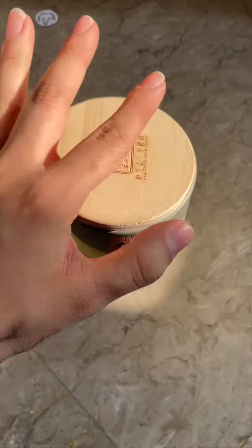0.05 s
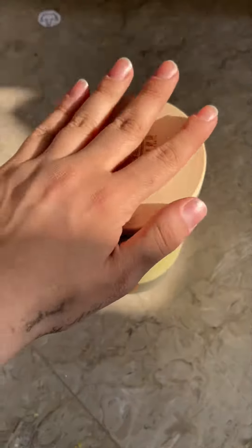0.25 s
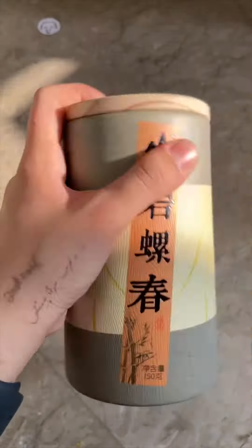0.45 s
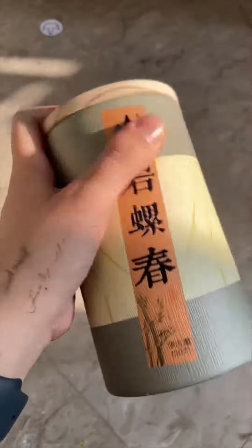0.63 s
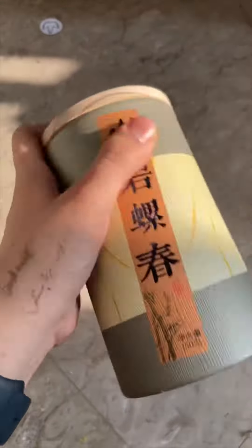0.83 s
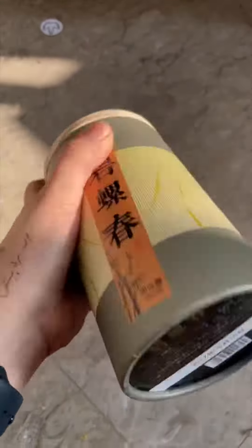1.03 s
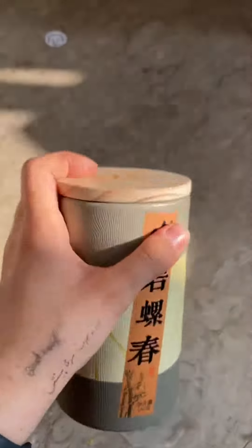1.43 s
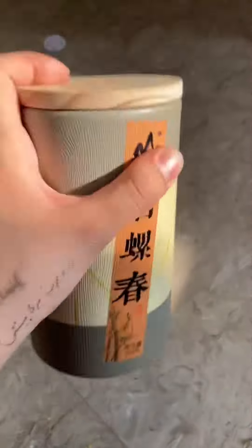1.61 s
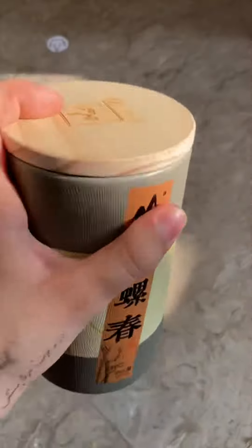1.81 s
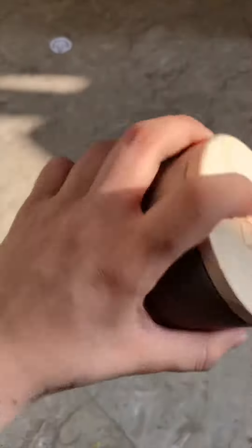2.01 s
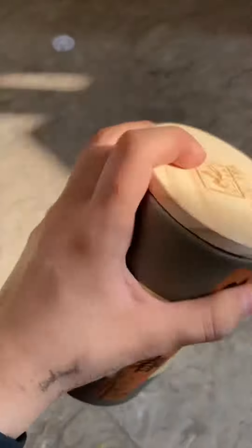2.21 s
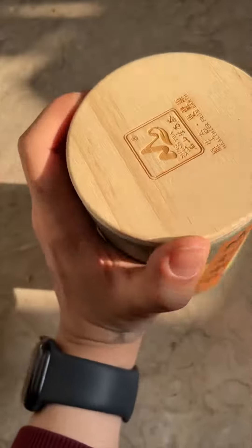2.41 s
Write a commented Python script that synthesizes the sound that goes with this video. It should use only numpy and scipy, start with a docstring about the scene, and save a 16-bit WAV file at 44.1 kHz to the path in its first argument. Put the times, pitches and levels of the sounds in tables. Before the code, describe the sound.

Dry bits, probably tea leaves, rattle in uneven surges inside a hand-shaken, wooden-lidded canister.

```python
"""Dry loose contents, probably tea leaves, rattle in a wooden-lidded canister tilted and shaken by hand.
At each swing the pieces slide and land in a surge of tiny impacts: dull on the end, clacking on the
wall, crisp on each other. Single hard pieces click out; the hand bumps and brushes the canister.
Heard in a quiet room, close up, on a pair of microphones."""
import sys
import numpy as np
from scipy import signal
from scipy.fft import rfft, irfft, next_fast_len
from scipy.io import wavfile

SR = 44100
rng = np.random.default_rng(int(sys.argv[2]) if len(sys.argv) > 2 else 0)


def unload_audio(sound):
    """Save the sound as a 16-bit wav file, at the path given as the first command line argument."""
    columns = np.transpose(np.atleast_2d(sound))
    # keep every value between -1 and 1, then stretch to whole-number steps
    steps = np.round(np.clip(columns, -1, 1) * 32767)
    wavfile.write(sys.argv[1], SR, steps.astype(np.int16))


N = 112454
T = np.arange(N) / SR

# Table levels are relative within each layer.
# low rumble of room and handling: f/Hz, level/dB
RUMBLE_SPECTRUM = [(20, -50), (40, -17), (58, 0), (100, -8), (250, -13), (400, -22), (900, -27),
                   (2000, -44), (6000, -55), (15000, -60)]
# its rise and fall: t/s, level/dB
RUMBLE_LEVELS = [(0, -59), (.13, -55), (.4, -58), (.43, -69), (2.3, -69), (2.34, -71), (2.45, -65),
                 (2.55, -63)]
# palm bumps: t/s, level/dB, contact time/s
PALM_BUMPS = [(.191, -43, .0025), (.210, -37, .0024), (.2226, -37, .001), (.2265, -34.5, .0018),
              (2.493, -45.5, .0005)]
# soft thud of the palm: f/Hz, level/dB
PALM_SPECTRUM = [(25, -15), (65, 0), (130, -4), (450, -7), (650, -15), (1150, -16), (1800, -32),
                 (6000, -44), (15000, -60)]
# ring of the canister, damped by the hand: f/Hz, level/dB, t60/s
GRIPPED_MODES = [(90, -8, .07), (260, -5, .025), (450, -2, .018), (780, -3, .012), (1200, -8, .018)]
# skin brushing the lid, and a faint hiss just after the stop: t/s, level/dB, half length/s
LID_BRUSHES = [(.205, -60, .04), (.335, -64, .045), (2.35, -80, .06), (2.49, -77, .07)]
# skin on the canister: f/Hz, level/dB
SKIN_SPECTRUM = [(300, -6), (1200, -2), (2600, -1), (3800, -5), (5500, 0), (8000, -4), (10500, -3),
                 (15000, -20)]
# fingertip ticks: t/s, level/dB, upper edge/Hz
FINGER_TAPS = [(.158, -38, 14000), (.2228, -27, 3400), (2.427, -46, 7000)]
# narrow resonances of the enclosed air: f/Hz, width/Hz, level/dB
CAVITY_MODES = [(666, 25, -9), (820, 25, -6), (1582, 18, -12), (3190, 35, -5), (4690, 60, -12),
                (4981, 30, -6)]
# clumps that draw one note from the canister: t/s, level/dB, f/Hz, t60/s
CLUMP_KNOCKS = [(.421, -29, 2310, .07), (.477, -33, 1150, .025), (.478, -38, 440, .035),
                (.613, -26.5, 2180, .075), (.657, -33, 1330, .03), (1.097, -45, 420, .03),
                (1.384, -29.5, 860, .05), (1.399, -32.5, 830, .05), (1.411, -35, 800, .035),
                (1.578, -43, 390, .05), (1.702, -27, 1150, .04), (1.710, -30, 680, .035),
                (2.156, -31, 2410, .05), (2.172, -49, 220, .03)]
# brittle edges snapping: t/s, level/dB
EDGE_SNAPS = [(.4967, -25), (.5964, -29), (1.0928, -28), (1.3254, -13), (1.6076, -21), (2.1604, -23)]
# hard pieces on the wall: t/s, level/dB, brightness/dB, ring of the struck spot/Hz
HARD_CLICKS = [(.4812, -23, -12, 1590), (.5978, -26, -10, 2130), (.6015, -28, -7, 3150),
               (.6444, -34, -20, 2090), (.6526, -32, -20, 2150), (.6582, -26, -18, 2130),
               (.6712, -30, -11, 2130), (.6811, -28, -8, 2110), (.6842, -26.5, -15, 2045),
               (.69, -28, -18, 1810), (.7011, -29, -10, 2220), (.7099, -29, -10, 2500),
               (.7197, -31, -16, 1940), (.7508, -37, -17, 2130), (.8589, -33, -13, 2220),
               (.8976, -29, -10, 2670), (.9045, -23.5, -19, 2170), (.9266, -33, -7, 2220),
               (.9384, -33, -13, 1850), (.9866, -39, -13, 2170), (1.0411, -34, -9, 2370),
               (1.0926, -28.5, -7, 2300), (1.1324, -28, -8, 2670), (1.1448, -34, -12, 2240),
               (1.2077, -40.5, -7, 2220), (1.2298, -35, -4, 2280), (1.2626, -35, -4, 1440),
               (1.2795, -37, -6, 1640), (1.3025, -30, -9, 2390), (1.3215, -26, -3, 3500),
               (1.3847, -26, -18, 1550), (1.4105, -29, -14, 2350), (1.422, -30, -14, 2230),
               (1.4528, -30, -10, 2000), (1.4708, -32, -14, 2070), (1.4895, -42, -14, 2500),
               (1.554, -38, -5, 1500), (1.5777, -29.5, -7, 3100), (1.6089, -25, -6, 2860),
               (1.7024, -25, -10, 1570), (1.7103, -24, -11, 1460), (1.7295, -30, -6, 2690),
               (1.7549, -29, -11, 2260), (1.7728, -33, -8, 2780), (1.8041, -40, -6, 2370),
               (1.9678, -32, -8, 2110), (2.0395, -37, -1, 2450), (2.1119, -40, -14, 2240),
               (2.1559, -25, -9, 2370), (2.2455, -33, -10, 3230), (2.2851, -35, -16, 2450),
               (2.298, -35, -1, 2700)]
# weaker rings of the whole wall: f/Hz, level/dB, t60/s
WALL_OVERTONES = [(700, -20, .025), (860, -21, .02), (1580, -12, .014), (2550, -11, .008),
                  (3190, -10, .008), (4980, -15, .007)]
# the wall's main ring, shifting with tilt and grip: t/s, f/Hz, level/dB
WALL_RING_PATH = [(.43, 2300, 0), (.47, 2050, -3), (.5, 1650, -5), (.58, 2180, -3), (.62, 2180, 4),
                  (.7, 1980, 2), (.75, 2150, 0), (.8, 3100, -3), (.86, 2230, -2), (.91, 2250, 1),
                  (1.03, 2700, -6), (1.1, 2100, -4), (1.2, 2200, -3), (1.325, 3600, -2), (1.38, 1550, -3),
                  (1.45, 2150, -3), (1.51, 2300, -2), (1.555, 1520, 1), (1.58, 2950, 0), (1.615, 2820, 2),
                  (1.7, 1500, -1), (1.76, 1950, -4), (1.9, 2350, -6), (2.0, 2800, -4), (2.16, 2450, 0),
                  (2.21, 3000, -1), (2.255, 3250, 2), (2.29, 2350, 2)]
# impacts heard through the canister: f/Hz, level/dB
IMPACT_SPECTRUM = [(40, -40), (130, -23), (300, -18), (450, -12.5), (660, -6.5), (750, -9), (850, -4.5),
                   (1020, -7), (1300, -3), (1580, -1), (1780, -4), (2120, -1), (2700, -2.3), (3200, -3),
                   (3700, -5.5), (5000, -7), (6700, -7.5), (7700, -20), (8700, -16.5), (10000, -15),
                   (11500, -24), (13000, -28), (15700, -33)]
# surges of the contents: peak t/s, 10 dB rise/s, 10 dB fall/s, clatter/dB, patter/dB, crisp ticks/dB
SHAKE_SURGES = [(0.429, 0.023, 0.018, -34.0, -45.0, -40.0), (0.479, 0.033, 0.031, -26.5, -38.0, -33.0),
                (0.532, 0.072, 0.01, -38.0, -58.0, -43.0), (0.579, 0.013, 0.073, -39.5, -47.0, -44.0),
                (0.599, 0.007, 0.013, -30.0, -41.0, -35.0), (0.617, 0.007, 0.011, -33.0, -49.0, -45.0),
                (0.69, 0.04, 0.034, -34.0, -48.5, -40.0), (0.801, 0.026, 0.022, -33.0, -45.0, -38.0),
                (0.859, 0.059, 0.034, -43.0, -52.0, -52.0), (0.908, 0.032, 0.011, -31.0, -47.0, -41.0),
                (0.928, 0.009, 0.056, -41.0, -56.0, -48.0), (1.026, 0.037, 0.039, -35.0, -48.0, -41.0),
                (1.1, 0.017, 0.027, -29.5, -41.0, -36.0), (1.133, 0.013, 0.026, -37.0, -56.0, -44.0),
                (1.227, 0.089, 0.112, -49.0, -62.0, -53.0), (1.261, 0.005, 0.078, -45.0, -51.0, -46.0),
                (1.303, 0.027, 0.104, -36.0, -46.0, -43.0), (1.325, 0.011, 0.013, -30.0, -47.0, -28.0),
                (1.386, 0.009, 0.023, -41.0, -41.0, -44.0), (1.411, 0.019, 0.021, -36.0, -41.0, -36.0),
                (1.461, 0.078, 0.017, -34.0, -50.0, -38.0), (1.555, 0.007, 0.033, -38.0, -48.0, -40.0),
                (1.581, 0.011, 0.032, -37.0, -46.0, -40.0), (1.612, 0.022, 0.013, -31.0, -45.0, -32.0),
                (1.667, 0.024, 0.019, -53.0, -57.0, -60.0), (1.699, 0.01, 0.034, -28.0, -38.5, -34.0),
                (1.767, 0.05, 0.021, -33.0, -50.0, -41.0), (1.816, 0.021, 0.01, -52.0, -68.0, -61.0),
                (1.893, 0.037, 0.039, -35.0, -46.0, -40.0), (1.938, 0.051, 0.016, -37.0, -48.0, -45.0),
                (2.002, 0.056, 0.047, -36.0, -52.0, -40.0), (2.094, 0.019, 0.014, -43.0, -62.0, -53.0),
                (2.162, 0.031, 0.022, -29.0, -44.0, -32.0), (2.202, 0.011, 0.048, -37.0, -52.0, -44.0),
                (2.242, 0.016, 0.059, -33.0, -52.0, -41.0)]
# phase at the microphones: f/Hz, lead of left over right/rad
MIC_LEAD = [(20, 0), (1500, 0), (2300, .3), (2700, 1.15), (3300, 1.2), (3600, .8), (4400, .85), (5000, 0),
            (6000, 1.3), (7300, 3.1), (8200, 3.4), (10500, 6.25), (12200, 6.35), (13200, 9.3), (16000, 9.5)]
# balance at the microphones: f/Hz, left minus right/dB
MIC_BALANCE = [(60, 0.0), (99, 0.0), (160, -1.0), (270, -0.5), (450, 0.0), (740, 1.5), (1220, 0.5),
               (2010, 0.0), (3330, -0.5), (5500, -0.5), (9080, 0.0), (15000, 0.0)]
# echo decay in the canister and in the room: f/Hz, t60/s
CANISTER_DECAY = [(300, .03), (800, .04), (2200, .035), (5000, .03), (14000, .025)]
ROOM_DECAY = [(200, .25), (2000, .22), (12000, .12)]

CUT_IN_S, CUT_OFF_S = .417, 2.2995  # the sound cuts in abruptly and is cut off, echo and all, as by a gate
PATTER_HZ, CRISP_HZ = 1150, 4400  # where patter gives way to clatter, and clatter to ticks
FULL_DB, CROWDING = -32, .75  # level of a full surge; power of the level that sets the impact rate
WALL_LOW_HZ, HELD_LOW_HZ = 650, 55  # the wall's ring and the gripped canister's ring are kept above these


def amp(db):
    """Decibels to gain."""
    return 10 ** (np.asarray(db) / 20)


def read(points, hz):
    """Reads a table on a log-frequency axis."""
    f, value = np.transpose(points)
    return np.interp(np.log(hz + 1), np.log(f + 1), value)


def add(mix, s, sound):
    """Adds a sound to the mix at a time."""
    part = mix[:, round(s * SR):][:, :sound.shape[-1]]
    part += sound[..., :part.shape[1]]


def unit(x):
    """Scales each channel to energy 1."""
    return x / np.sqrt((x ** 2).sum(-1, keepdims=True) + 1e-20)


def through(x, response):
    """Convolves each channel with a response."""
    return signal.fftconvolve(np.atleast_2d(x), np.atleast_2d(response), axes=1)[:, :N]


def low_cut(x, hz):
    """Rolls off the bass below an edge."""
    return signal.sosfilt(signal.butter(2, hz, "high", fs=SR, output="sos"), x)


def colour(points, low_hz=1, high_hz=SR, size=4096, order=5):
    """Minimum-phase response of energy 1 with the given spectrum, kept between two edges."""
    hz = abs(np.fft.fftfreq(size, 1 / SR)) + 1
    edges = (1 + (low_hz / hz) ** (2 * order)) * (1 + (hz / high_hz) ** (2 * order))
    gain = amp(read(points, hz)) / np.sqrt(edges)
    log_gain = np.log(np.maximum(gain, 1e-5))
    spectrum = np.exp(np.conj(signal.hilbert(log_gain)))
    return unit(np.fft.ifft(spectrum).real[:size // 2])


def resonate(x, hz, width_hz):
    """A resonance of gain 1 that follows a pitch curve."""
    turn = np.exp(2j * np.pi * np.cumsum(hz) / SR)
    pole = np.exp(-np.pi * width_hz / SR)
    return 2 * (turn * signal.lfilter([1 - pole], [1, -pole], x / turn + 1e-18)).real


def note(t, hz, db, t60):
    """One mode ringing down."""
    return amp(db - 60 * t / t60) * np.sin(2 * np.pi * hz * t)


def pair(length, apart):
    """White noise at two microphones, partly unrelated."""
    mid, side = rng.standard_normal((2, length))
    return np.array([mid + apart * side, mid - apart * side]) / np.sqrt(1 + apart ** 2)


def crack(decay_s, apart, size=400):
    """One brief contact: a tiny burst with a chance colour of its own."""
    return unit(pair(size, apart) * np.exp(-np.arange(size) / SR / decay_s))


def tail(t60s, apart):
    """Dense reflections, each band dying at its own speed."""
    hz, t, bands = signal.stft(pair(SR // 3, apart), SR, nperseg=128)
    decay = amp(-60 * t / read(t60s, hz)[:, None])
    ring = signal.istft(bands * decay, SR, nperseg=128)[1]
    return unit(ring * np.minimum(T[:ring.shape[1]] / .002, 1))


def background():
    """Low rumble of room and handling, under everything."""
    level = amp(np.interp(T, *np.transpose(RUMBLE_LEVELS)))
    return through(pair(N, apart=.05), colour(RUMBLE_SPECTRUM)) * level


def hand(flesh_db=-3.5, flesh_decay_s=.009):
    """The palm bumps the canister, duller the longer the contact, and brushes over the lid."""
    bumps, t = np.zeros((2, N)), T[:SR // 10]
    ring = sum((-1) ** k * note(t, *mode) for k, mode in enumerate(GRIPPED_MODES))
    for s, db, contact in PALM_BUMPS:
        press = np.sin(np.pi * np.minimum(t / contact, 1)) ** 2
        add(bumps, s, amp(db) * through(ring, press / press.sum()))
    push = sum(amp(db + flesh_db) * (T > s) * np.exp(-abs(T - s) / flesh_decay_s)
               for s, db, _ in PALM_BUMPS)
    thuds = through(pair(N, apart=.08) * push, colour(PALM_SPECTRUM))
    rub = sum(amp(db) * np.exp(-((T - s) / half) ** 2) for s, db, half in LID_BRUSHES)
    rub *= T > FINGER_TAPS[0][0]  # only after the first touch
    brushing = through(pair(N, apart=.4) * rub, colour(SKIN_SPECTRUM))
    return low_cut(bumps, HELD_LOW_HZ) + thuds + brushing


def taps():
    """Fingertips touch the lid and wall."""
    out = np.zeros((2, N))
    for s, db, top_hz in FINGER_TAPS:
        add(out, s, amp(db) * through(crack(.0016, apart=.3), colour(SKIN_SPECTRUM, high_hz=top_hz)))
    return out


def inner_echoes(x, turns_per_s=1.7, count=3):
    """Echoes inside the canister fade from one pattern into the next as it turns."""
    shares = np.array([np.cos(np.pi * (turns_per_s * T + k / count)) ** 2 for k in range(count)])
    shares /= np.linalg.norm(shares, axis=0)
    return sum(through(x * share, tail(CANISTER_DECAY, apart=.25)) for share in shares)


def enclosed_air(x):
    """The air in the canister rings on at a few steady pitches."""
    return sum(amp(db) * resonate(x, np.full(N, hz), width) for hz, width, db in CAVITY_MODES)


def knocks():
    """A clump makes the canister give a short hollow note."""
    out, t = np.zeros((2, N)), T[:SR // 10]
    attack = np.minimum(t / .002, 1)
    for s, db, hz, t60 in CLUMP_KNOCKS:
        add(out, s, attack * note(t, hz, db, t60))
    return out


def snaps():
    """Brittle edges give very short, high ticks."""
    out, glint = np.zeros((2, N)), colour(IMPACT_SPECTRUM, low_hz=8500)
    for s, db in EDGE_SNAPS:
        add(out, s, amp(db) * unit(through(crack(.0003, apart=.3), glint)))
    return out


def clicks(ring_db=5.5, clack_db=14, tick_db=18.3, decay_s=.0006):
    """A hard piece clacks, ticks and rings the wall, at its own pitch on each spot."""
    out, t = np.zeros((2, N)), T[:SR // 20]
    clack = colour(IMPACT_SPECTRUM, PATTER_HZ, CRISP_HZ)
    tick = colour(IMPACT_SPECTRUM, low_hz=CRISP_HZ)
    for s, db, bright_db, spot_hz in HARD_CLICKS:
        detune = 1 + .05 * rng.standard_normal(len(WALL_OVERTONES))
        wall = sum((-1) ** k * note(t, hz * detune[k], level, t60)
                   for k, (hz, level, t60) in enumerate(WALL_OVERTONES))
        spot = note(t, spot_hz, db=-2, t60=.012)
        dull = amp(db) / (1 + amp(bright_db) ** 2)
        add(out, s, dull * amp(ring_db) * low_cut(wall - spot, WALL_LOW_HZ))
        add(out, s, dull * amp(clack_db) * unit(through(crack(decay_s, apart=.25), clack)))
        add(out, s, amp(db + tick_db + bright_db) * unit(through(crack(decay_s, apart=.3), tick)))
    return out


def impacts(levels_db, per_s, spread_db, decay_s, apart, kinds=16):
    """Pieces land more often and harder as each surge swells, each with one of several cracks."""
    power = sum(amp(db - 10 * np.maximum((s - T) / rise, (T - s) / fall)) ** 2
                for (s, rise, fall, *_), db in zip(SHAKE_SURGES, levels_db))
    level = np.sqrt(power) * (T > CUT_IN_S) + 1e-9
    rate = per_s * (level / amp(FULL_DB)) ** CROWDING
    chance, weight, pick = rng.random((3, N))
    size = amp(spread_db * np.minimum(-np.log(1 - weight), 3))  # many light pieces, few heavy
    size /= np.sqrt(np.mean(size ** 2))
    landings = (chance < rate / SR) * size * level * np.sqrt(SR / rate)
    kind = (pick * kinds).astype(int)
    return sum(through(landings * (kind == k), crack(decay_s, apart)) for k in range(kinds))


def contents():
    """Pieces clatter on the wall and ring it, patter on the end and tick crisply on each other."""
    wall_db, end_db, crisp_db = np.transpose(SHAKE_SURGES)[3:]
    on_wall = impacts(wall_db, per_s=3800, spread_db=4.2, decay_s=.0006, apart=.27)
    on_end = impacts(end_db, per_s=3500, spread_db=3.0, decay_s=.0005, apart=.14)
    on_pieces = impacts(crisp_db, per_s=11000, spread_db=3.3, decay_s=.0006, apart=.27)
    clatter = through(on_wall, colour(IMPACT_SPECTRUM, PATTER_HZ, CRISP_HZ))
    patter = through(on_end, colour(IMPACT_SPECTRUM, high_hz=PATTER_HZ))
    crisp = through(on_pieces, colour(IMPACT_SPECTRUM, low_hz=CRISP_HZ))
    s, hz, db = np.transpose(WALL_RING_PATH)
    ring = resonate(clatter, np.interp(T, s, hz), width_hz=260)
    ring_gain = amp(np.interp(T, s, db))
    clatter = (clatter + ring_gain * ring) / (1 + .3 * ring_gain)
    return amp(-2) * clatter + amp(-.3) * patter + amp(-2) * crisp


def scene(inside_db=-10.5, room_db=-24):
    """Close up, the rattle rings inside the canister and only faintly in the room."""
    rattle = contents() + clicks() + snaps()
    rattle = rattle + enclosed_air(rattle) + knocks()
    rattle = rattle + amp(inside_db) * inner_echoes(rattle)
    rattle = rattle + amp(room_db) * through(rattle, tail(ROOM_DECAY, apart=.7))
    cut_off = np.clip((CUT_OFF_S - T) / .001, 0, 1)
    return rattle * cut_off + hand() + taps() + background()


def record(dry):
    """The close microphone pair: phase and level differences between the sides, then a band limit."""
    size = next_fast_len(N + SR // 10)
    hz, sides = np.fft.rfftfreq(size, 1 / SR), np.array([[.5], [-.5]])
    mics = amp(sides * read(MIC_BALANCE, hz)) * np.exp(1j * sides * read(MIC_LEAD, hz))
    heard = irfft(rfft(dry, size) * mics, size)[:, :N]
    band_limit = signal.firwin(511, cutoff=15780, window=("kaiser", 9), fs=SR)
    return signal.oaconvolve(heard, band_limit[None], "same")


dry = scene()
out = record(dry)
unload_audio(out)
```